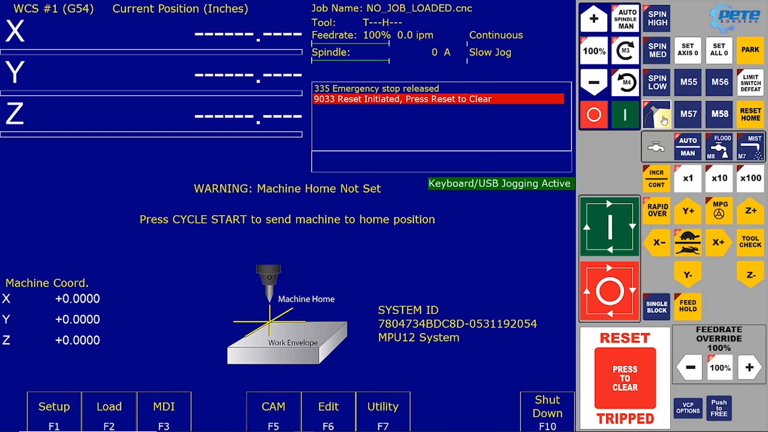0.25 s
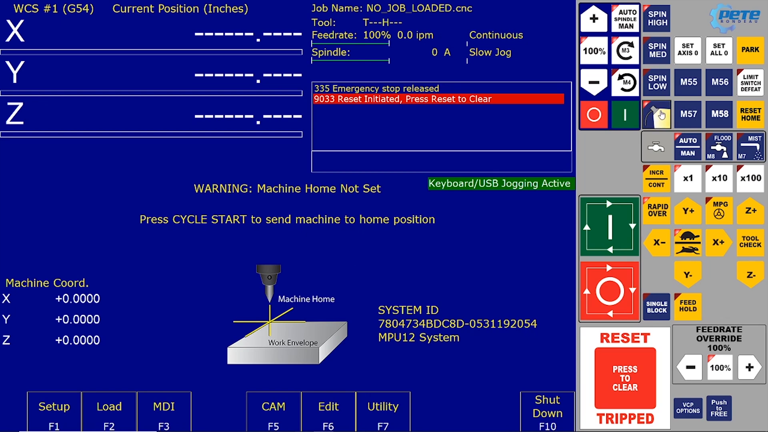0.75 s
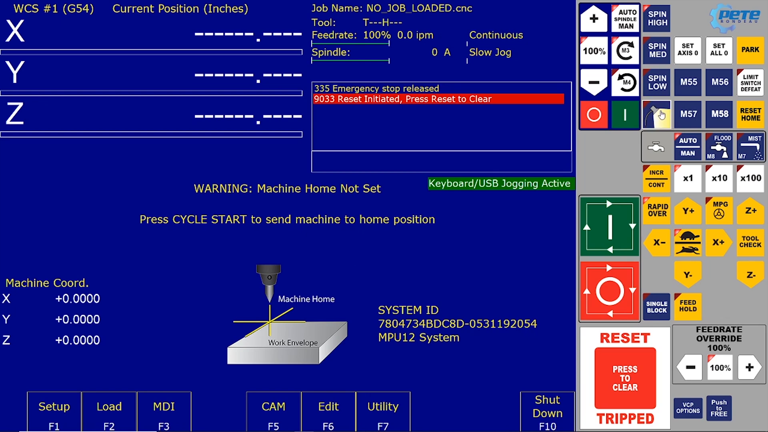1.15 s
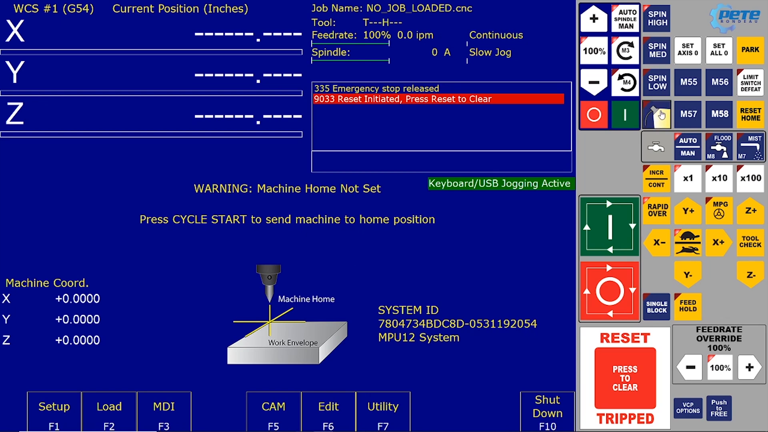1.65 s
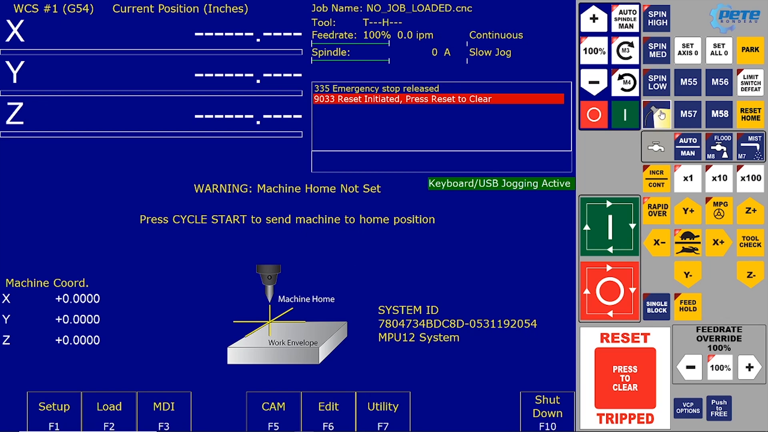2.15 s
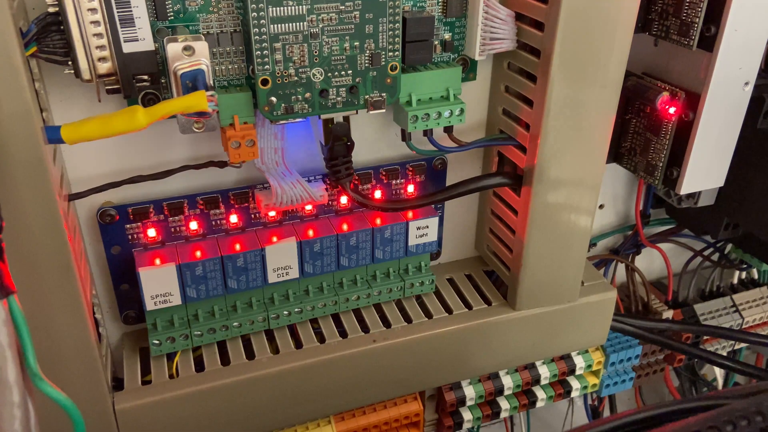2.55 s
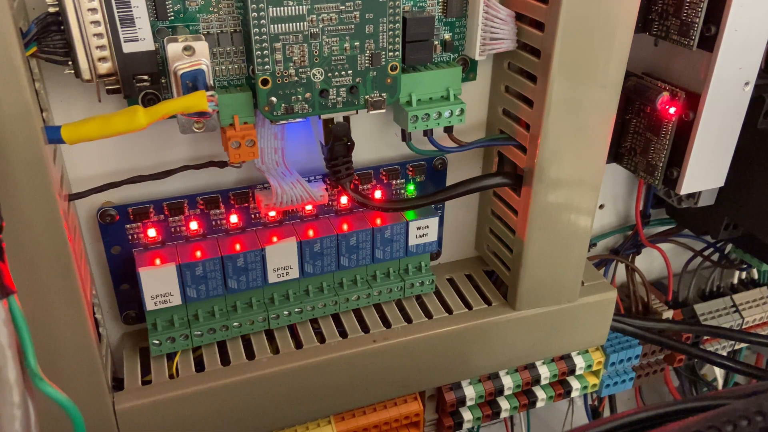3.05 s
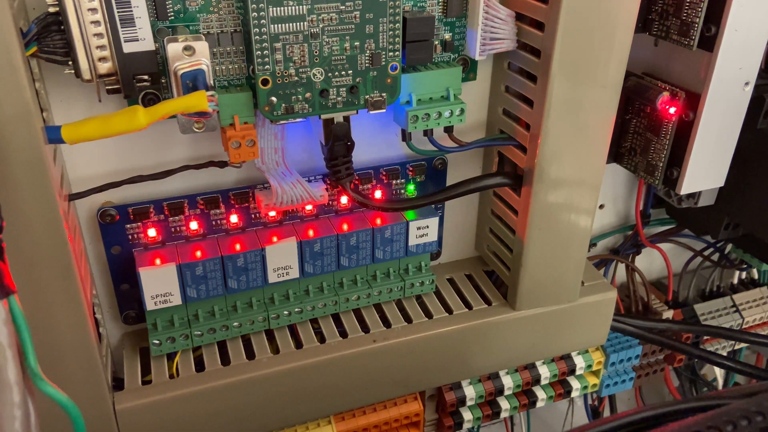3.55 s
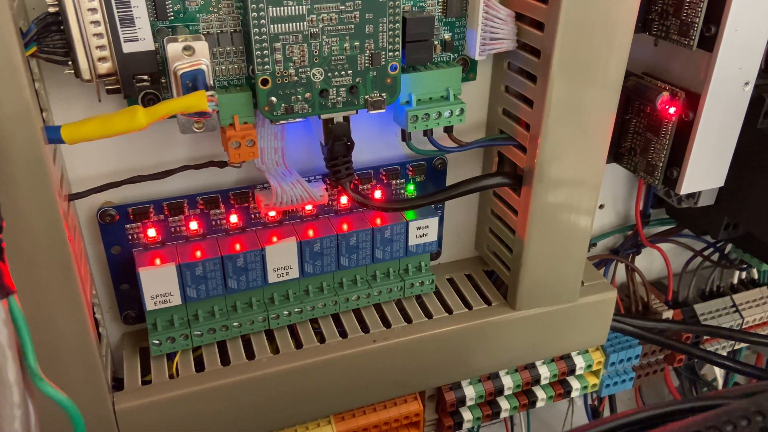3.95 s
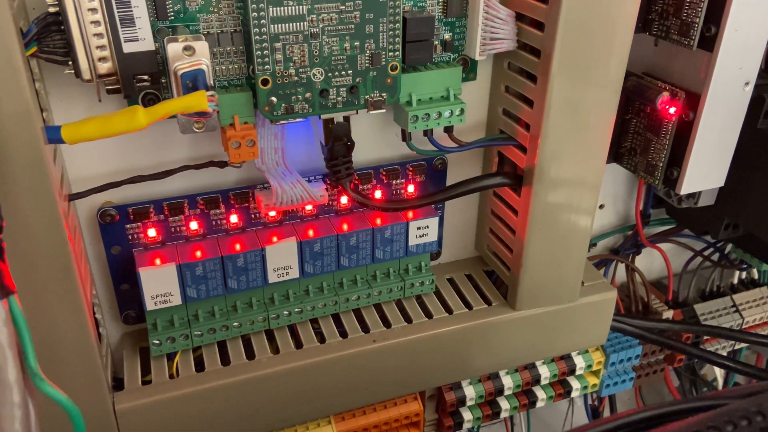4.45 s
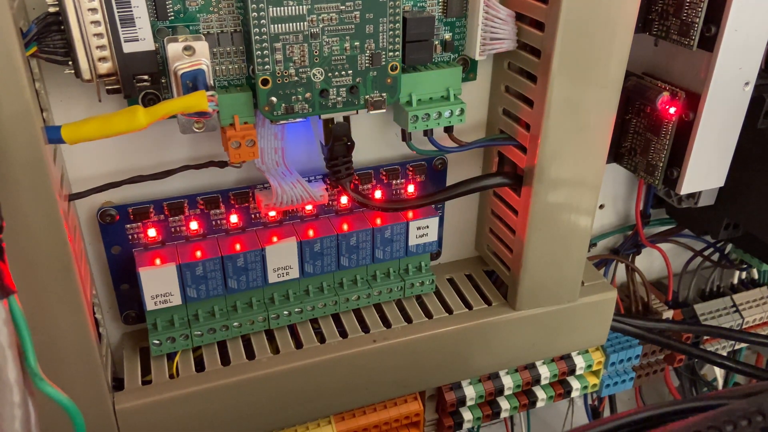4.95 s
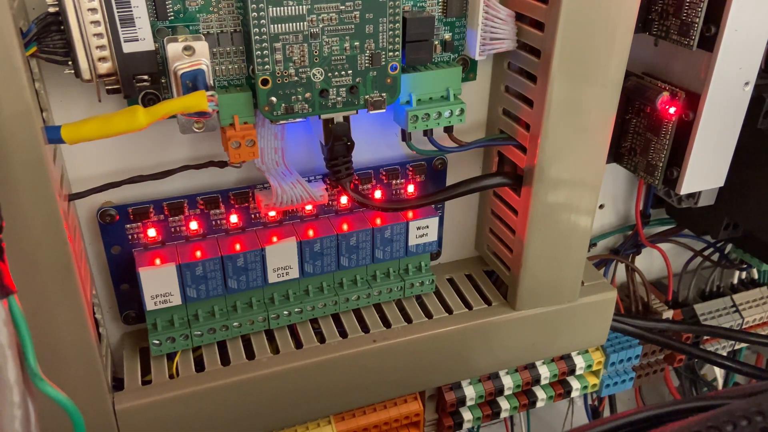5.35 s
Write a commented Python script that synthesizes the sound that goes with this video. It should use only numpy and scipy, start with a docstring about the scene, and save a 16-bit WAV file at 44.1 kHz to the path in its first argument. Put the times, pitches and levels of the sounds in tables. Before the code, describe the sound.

A steady bed of cooling fan hiss and low transformer hum fills an electrical control cabinet for the whole five and a half seconds. The fans sit somewhat to the right, and one has a low tone that swells and fades unevenly. Close to the microphones, a small relay gives a soft, dull click as it releases at 0.7 seconds. At 1.9 seconds it pulls in with a much louder, sharp, bright click, then releases softly at 2.0. Another sharp click comes at 3.0 and a last soft one at 4.3. Each is very short, with a tiny metallic ring and slight cabinet echo. Three faint dry ticks fall between 1.8 and 2.4 seconds. Very faint, blurred clicks of a distant button come just before or after most switchings, with one more near 5.5 seconds.

```python
"""A relay clicking in a control cabinet

A small relay on a board switches a light: its moving iron arm strikes the core as it pulls in and
springs back as it drops out. Faint, far button clicks come just before or after most switchings.
Cooling fans whir and hiss to the right of two spaced microphones, and a transformer hums."""
import sys
import numpy as np
from scipy import signal
from scipy.fft import rfft, irfft, next_fast_len
from scipy.io import wavfile

SR = 44100
rng = np.random.default_rng(int(sys.argv[2]) if len(sys.argv) > 2 else 0)


def to_wav(s):
    """Save 16-bit WAV."""
    ch = np.atleast_2d(s).T  # columns
    pcm = np.round(np.clip(ch, -1, 1) * 32767)  # PCM
    wavfile.write(sys.argv[1], SR, pcm.astype(np.int16))


N = 246519
TIME = np.arange(N) / SR
BURST_TIME = np.arange(SR // 3) / SR   # a third of a second, enough for one short sound
LEFT_LAG_SAMPLES = 12   # sound from the right reaches the left microphone this much later


def from_db(db):
    """Turn decibels into a number to multiply by."""
    return 10 ** (np.asarray(db) / 20)


def unit_level(x):
    """Scale a signal so that its average level (rms) is 1."""
    return x / np.sqrt(np.mean(x ** 2) + 1e-20)


def drift(rate_hz):
    """A slow random wobble of about size 1, made by smoothing noise twice."""
    step, warm_up = 50, 2000
    pole = np.exp(-2 * np.pi * rate_hz * step / SR)
    noise = rng.standard_normal(N // step + warm_up + 2)
    slow = signal.lfilter([1], [1, -2 * pole, pole * pole], noise)[warm_up:]
    return np.interp(np.arange(N) / step, np.arange(len(slow)), unit_level(slow))


def band(x, low_hz, high_hz):
    """Keep the sound between two pitches and soften the rest."""
    return signal.sosfilt(signal.butter(2, [low_hz, high_hz], "band", fs=SR, output="sos"), x)


def dying_noise(fade_s, channels=2):
    """A burst of noise with energy 1 that falls by 60 dB in fade_s."""
    burst = rng.standard_normal((channels, len(BURST_TIME))) * from_db(-60 * BURST_TIME / fade_s)
    return burst / np.sqrt(np.sum(burst ** 2, axis=1, keepdims=True))


def from_right(x):
    """Put a sound on the right by letting the left microphone hear it a little later."""
    left, right = x * np.ones((2, 1))
    late_left = np.concatenate([np.zeros(LEFT_LAG_SAMPLES), left[:-LEFT_LAG_SAMPLES]])
    return np.array([late_left, right])


def play_at(events, sound):
    """Play a copy of a stereo sound at each listed time and gain."""
    triggers = np.zeros((1, N))
    for start_s, gain_db in events:
        triggers[0, round(start_s * SR)] = from_db(gain_db)
    return signal.fftconvolve(triggers, sound, axes=1)[:, :N]


# The steady hiss, low to high; the last row cuts it off above 15.8 kHz.
# pitch_hz, left_db_per_hz, right_db_per_hz, direct_share (0 is all scattered, 1 all direct)
STEADY_HISS = [(32, -95, -90, 0.55), (44, -72.5, -74.5, 1), (185, -71, -69.5, 1), (290, -76, -78, 1),
               (483, -76, -76, 0), (824, -79, -80, 0.34), (1190, -82, -81, 0.1), (1750, -82.5, -85, 0.2),
               (2960, -86.5, -91, 0), (3330, -92, -94.5, 0.3), (6450, -101, -101, 0.36),
               (6770, -104.5, -104.5, 1), (15800, -110, -110, 1), (15850, -135, -135, 1)]
# Narrow ranges of pitch where the hiss is louder or softer.
# pitch_hz, width_hz, left_boost_db, right_boost_db, left_phase_rad
HISS_PEAKS_AND_DIPS = [(172, 29, 5, 4.5, 0), (203, 16, 8, 7.5, 0), (372, 60, 10, 3, -0.3),
                       (482, 27, 8, 8, -1), (606, 19, 16, 5, -1.5), (632, 20, 6, 0, 0), (718, 18, 6, 6, 0),
                       (750, 24, -7, -1, 0), (800, 70, 5, 0, 0), (918, 84, 5, 2, -0.16),
                       (1040, 90, 3, -1.5, 0), (1130, 40, -4, 0, 0), (1210, 70, -1, 3.5, 0),
                       (1325, 110, 8, 3, -1.6), (1362, 60, 0, 6, 0), (1610, 70, 2, 3, 0),
                       (1670, 100, -3, 0, 0), (1963, 160, 6, 4.5, 3.5), (2065, 90, 0, -5, 0),
                       (2150, 80, 0, 3.5, 0), (2370, 80, -3, -2, 0), (2500, 150, 3, 0, -1),
                       (2622, 60, 4, 3, -1), (2692, 50, 4.5, 0, -1), (2900, 300, 0, 4, 0),
                       (3035, 90, 6, 1, -1.5), (3280, 90, 5.5, 0, 0), (3700, 250, 3, 0, 0),
                       (5020, 280, 7, 4, 1.5), (8500, 900, 3, 3, 0), (10550, 200, 5.5, 5.5, 0),
                       (11050, 150, -3, -3, 0), (11700, 250, 5.5, 5.5, 0), (12300, 150, 4, 4, 0),
                       (13200, 250, -4, -4, 0), (14550, 200, -7, -7, 0), (15400, 350, 4.5, 4.5, 0)]

def fan_hiss():
    """Rushing air: part comes straight from the right, part scatters and differs at each microphone."""
    size = next_fast_len(N)
    hz = np.maximum(np.arange(size // 2 + 1) * SR / size, 1)
    pitch_hz, *columns = np.transpose(STEADY_HISS)
    left_db, right_db, direct_share = [np.interp(np.log(hz), np.log(pitch_hz), c) for c in columns]
    level_db = np.array([left_db, right_db])
    left_phase = -2 * np.pi * hz * LEFT_LAG_SAMPLES / SR
    for centre_hz, width_hz, left_boost_db, right_boost_db, phase_rad in HISS_PEAKS_AND_DIPS:
        nearness = 1 / (1 + (2 * (hz - centre_hz) / width_hz) ** 2)
        level_db = level_db + nearness * np.array([[left_boost_db], [right_boost_db]])
        left_phase = left_phase + nearness * phase_rad
        direct_share = np.maximum(direct_share, 0.59 * nearness)   # both sides share much of it here
    shared, *separate = rfft(rng.standard_normal((3, size)))
    direct = np.sqrt(direct_share) * np.array([shared * np.exp(1j * left_phase), shared])
    scattered = np.sqrt(1 - direct_share) * np.array(separate)
    hiss = irfft((direct + scattered) * from_db(level_db) * np.sqrt(SR / 2), size)[:, :N]
    return hiss * from_db(.2 * drift(rate_hz=2.2))


# The steady tones of the transformer and the small fan.
# pitch_hz, left_db, right_db, left_lead_rad, waver_db
HUM_TONES = [(82.3, -58, -58.5, .3, 2.5), (120, -49, -54, 0, 1.5), (240, -41, -42, -0.15, 0.22),
             (328.3, -55.5, -57.5, 0.83, 2.5), (344.5, -61, -61.5, .5, 3), (360, -63, -63, .5, 2),
             (410, -64, -64.5, -.5, 2.5), (431, -72, -64, 0, 3), (490, -57, -56.5, -1.77, 2.5),
             (574.2, -49.5, -57, 1.54, 1), (834, -70, -69, 0, 3), (2624, -70, -80, 2.5, 1.5),
             (2952, -62.5, -72, 0, 2)]

def hum():
    """Mains power and the small fan make pure tones that waver a little in loudness."""
    tones = np.zeros((2, N))
    for pitch_hz, left_db, right_db, left_lead_rad, waver_db in HUM_TONES:
        phase = 2 * np.pi * (pitch_hz * TIME + rng.random()) + np.array([[left_lead_rad], [0]])
        level_db = np.array([[left_db], [right_db]]) + waver_db * drift(rate_hz=5.1)
        tones += np.sqrt(2) * from_db(level_db) * np.sin(phase)
    return tones


# How the tone of the big fan swells and fades.
# time_s, level_db
FAN_SWELLS = [(0, -48), (.3, -37), (.45, -42.5), (.8, -45.5), (.92, -39.5), (1.33, -38.5), (1.46, -35),
              (1.97, -36), (2.11, -49), (2.21, -38), (2.38, -40.5), (2.46, -60), (2.63, -38.5), (2.87, -46),
              (2.96, -36.5), (3.32, -40.5), (3.48, -37), (3.74, -44), (3.93, -37), (4.42, -48.5),
              (4.53, -40.5), (4.98, -41), (5.08, -34), (5.59, -35.5)]

def big_fan(pitch_hz=142.5, wander_hz=0.72, waver_db=2):
    """The passing blades make a slightly unsteady tone, with a softer one an octave above."""
    time_s, swell_db = np.transpose(FAN_SWELLS)
    phase = 2 * np.pi * np.cumsum(pitch_hz + wander_hz * drift(rate_hz=1.6)) / SR
    level_db = np.interp(TIME, time_s, swell_db) + waver_db * drift(rate_hz=7.4)
    tone = from_db(level_db) * np.sin(phase)
    octave_db = level_db + np.array([[-14.5], [-21.5]])   # left, right
    octave = from_db(octave_db) * np.sin(2 * phase)
    return from_right(np.sqrt(2) * (tone + octave))


# Three faint, dry ticks.
# start_s, level_db
FAINT_TICKS = [(1.8522, -28), (1.9853, -29), (2.3525, -32)]

def ticks():
    """Each tick is one sharp pulse, heard in the middle."""
    return play_at(FAINT_TICKS, np.ones((2, 1)))


# The faint clicks of the far button.
# start_s, gain_db
BUTTON_CLICKS = [(.655, -51), (.822, -45.5), (2.085, -46), (2.935, -51), (3.098, -45.5), (4.285, -51),
                 (4.452, -46), (5.490, -52)]

def far_button(rise_s=0.011, fade_s=0.12):
    """The room blurs each click of the button into a soft, bright puff."""
    puff = (1 - np.exp(-BURST_TIME / rise_s)) * from_db(-60 * BURST_TIME / fade_s)
    hiss = unit_level(band(rng.standard_normal((2, N)), 3800, 6940))
    return play_at(BUTTON_CLICKS, puff[None]) * hiss


# The tones the struck relay rings with. Their levels only set the balance between them.
# pitch_hz, fade_s, pull_in_db, drop_out_db, left_over_right_db, drop_out_delay_ms
RELAY_TONES = [(300, .07, -44, -32, -2, 1), (445, .05, -44, -29, 5, 0), (530, .07, -41, -29, 4, 1),
               (865, .075, -43, -27.5, -2, 6.5), (930, .05, -40, -30, 1, 2), (1010, .035, -44, -30, 2, 0),
               (1110, .03, -42, -33, 3, 1), (1250, .04, -38, -29, 4, 3), (1370, .05, -36, -33, 2, 2),
               (1650, .08, -37, -48, 3, 1), (1950, .035, -39, -42, 3, 1), (2260, .045, -40, -30.5, 5, 1),
               (2620, .03, -42, -39, 5, 1), (3350, .03, -40, -40, 0, 1), (4020, .04, -43, -37, 3, 3),
               (4240, .042, -43, -33.5, 4, 3), (4340, .03, -34, -35, 4, 1), (4860, .028, -24.5, -39, 3, 1),
               (5005, .034, -26, -37, 3, 2), (5190, .03, -36, -36, 3, 3), (5400, .03, -48, -35, 3, 2),
               (5680, .035, -50, -34, 3, 1), (5920, .03, -52, -36, 3, 3), (6140, .035, -50, -35, 3, 2),
               (6520, .032, -31, -26.5, 2, 0), (6810, .022, -30, -40, 3, 0), (6950, .022, -29, -37, 3, 0),
               (7390, .026, -34, -33, 2, 0), (7820, .028, -25.5, -35, 2, 0), (8265, .03, -34, -29, 0, 1.5),
               (8750, .025, -40, -44, -1, 1), (9390, .015, -27, -34, 0, 0), (9900, .013, -25, -28, 0, 0),
               (10510, .02, -27, -33, 0, 1), (10810, .022, -32, -34, 0, 1), (11190, .02, -27, -36, 0, 1),
               (11420, .02, -25, -42, 0, 2), (11580, .024, -24.5, -38, 0, 2), (11850, .02, -21, -38, 0, 2),
               (12550, .019, -24, -38, 0, 2), (12970, .02, -19, -43, 0, 2), (13350, .02, -34, -40, 0, 2),
               (13900, .022, -30, -40, 0, 1), (14460, .03, -32, -37, 0, 0), (14630, .032, -30, -40, 0, 0),
               (14900, .026, -33, -33, 0, 0), (15250, .028, -31, -35, 0, 0)]

def relay_ring(dropping_out):
    """The relay rings like a tiny bell. On dropping out, many tones wait for the later touches."""
    pitch_hz, fade_s, pull_db, drop_db, pan_db, drop_delay_ms = np.transpose(RELAY_TONES)[:, :, None]
    level_db = drop_db if dropping_out else pull_db
    start_s = .0005 + (drop_delay_ms / 1000 if dropping_out else 0)
    age_s = np.maximum(BURST_TIME - start_s, 0)
    strength = from_db(level_db) / np.sqrt(np.sum(from_db(2 * level_db)))   # powers add up to 1
    pan = from_db(np.array([pan_db, -pan_db]) / 2)
    rise_s = np.minimum(.006 * (1000 / pitch_hz) ** 1.7, .008)   # low tones build slowly in the panel
    envelope = (1 - np.exp(-age_s / rise_s)) * from_db(-60 * age_s / fade_s)
    phase = 2 * np.pi * rng.random(pitch_hz.shape)
    phase = phase + .2 * rng.standard_normal((2, *pitch_hz.shape))   # a bit off at each microphone
    return np.sum(strength * pan * envelope * np.sin(2 * np.pi * pitch_hz * age_s + phase), axis=1)


def relay_cracks(touches, boost_db=5.5, range_hz=(5600, 17000)):
    """Each touch of the relay's parts makes a very short, bright crack."""
    cracks = np.zeros(len(BURST_TIME))
    for delay_s, gain_db in touches:
        burst = dying_noise(fade_s=.0045, channels=1)[0]
        crack = band(band(burst, *range_hz), *range_hz)   # filtered twice for steeper edges
        start = round(delay_s * SR)
        cracks[start:] += from_db(gain_db + boost_db) * crack[:len(cracks) - start]
    return cracks


def relay_click(touches, ring, panel_db, panel_delay_s, room_db):
    """One click: the relay cracks and rings, its mounting panel rattles, and cabinet and room echo."""
    cracks = relay_cracks(touches)
    rattle = dying_noise(fade_s=0.11) * (BURST_TIME > panel_delay_s)
    panel = from_db(panel_db) * band(rattle, 350, 5540)
    cabinet = from_db(3) * dying_noise(fade_s=0.02, channels=1) * (BURST_TIME > 0.0029)
    cabinet = band(band(cabinet, 1000, 16500), 1000, 16500)
    room = from_db(room_db) * band(dying_noise(fade_s=.115), 420, 14500)
    cabinet_echo = from_right(signal.fftconvolve(cracks[None], cabinet, axes=1))
    reaching_walls = from_db(-10) * ring + cracks   # the ring carries less than the cracks
    echoes = cabinet_echo + signal.fftconvolve(reaching_walls, room, axes=1)
    return from_right(ring + cracks) + panel + echoes[:, :len(BURST_TIME)]


# The quick touches that make up one click, for pulling in and for dropping out.
# delay_s, gain_db
PULL_IN_TOUCHES = [(.0002, -23), (.0008, -2), (.0015, -3)]
DROP_OUT_TOUCHES = [(.0003, -7), (.0010, 2), (.0031, 2.5), (.0045, -2), (.0066, -10)]
# When the arm strikes the core (pulls in) and when it springs back (drops out).
# start_s, gain_db
PULL_INS = [(1.8598, -4), (3.0095, -4)]
DROP_OUTS = [(.7197, -16), (2.0056, -16.5), (4.3496, -16.5)]

def relay():
    """The arm pulls in with one sharp click and drops out with a softer, duller one, alike each time."""
    pull_ring = from_db(-4.5) * relay_ring(dropping_out=False)
    pull_click = relay_click(PULL_IN_TOUCHES, pull_ring, panel_db=0, panel_delay_s=0, room_db=-12)
    drop_ring = from_db(.5) * relay_ring(dropping_out=True)
    drop_click = relay_click(DROP_OUT_TOUCHES, drop_ring, panel_db=6, panel_delay_s=.001, room_db=-17)
    return play_at(PULL_INS, pull_click) + play_at(DROP_OUTS, drop_click)


def scene():
    """Add up all the sounds at the two microphones."""
    return relay() + far_button() + ticks() + big_fan() + hum() + fan_hiss()


def record(dry):
    """The microphones soften the highest treble, then a steep filter cuts off the very top."""
    microphones = signal.butter(10, 17500, fs=SR, output="sos")
    steep_cut = signal.cheby2(22, 40, 16887, fs=SR, output="sos")
    return signal.sosfilt(steep_cut, signal.sosfilt(microphones, dry))


dry = scene()
out = record(dry)
to_wav(out)
```